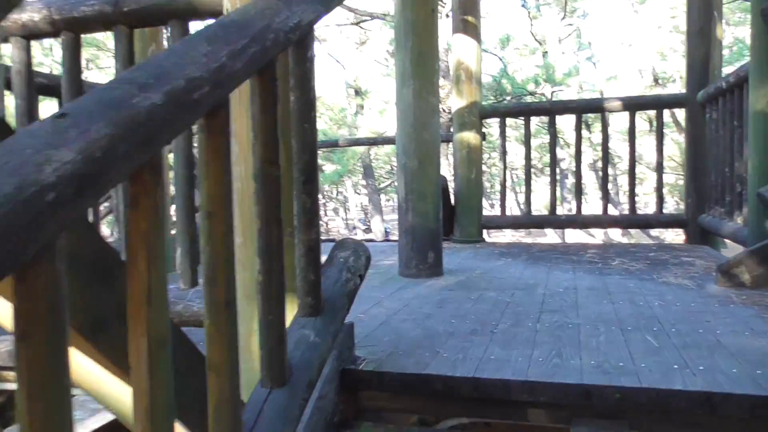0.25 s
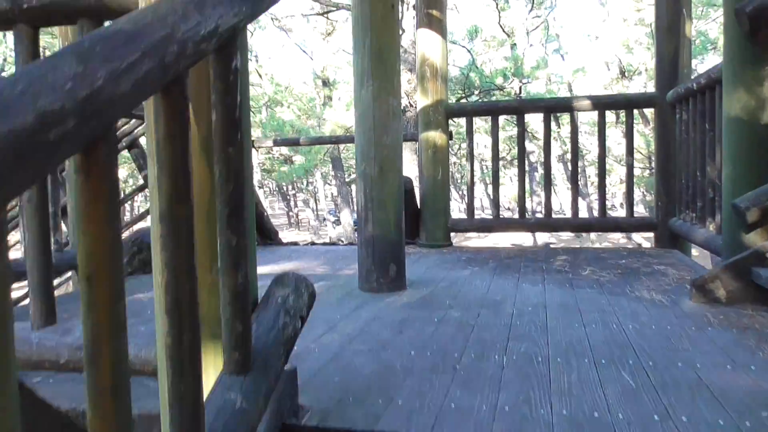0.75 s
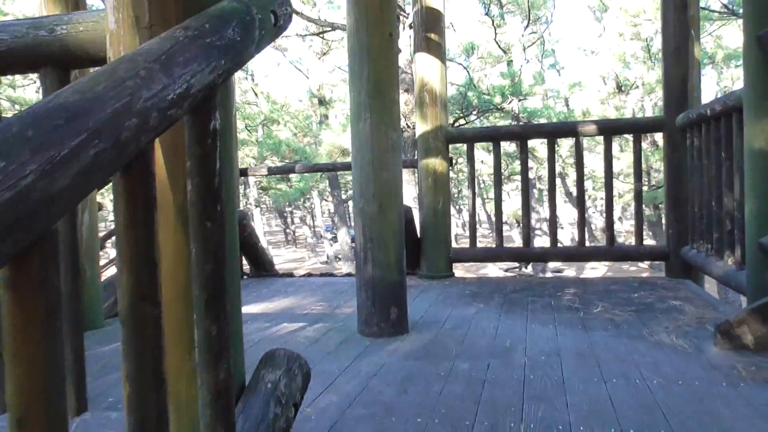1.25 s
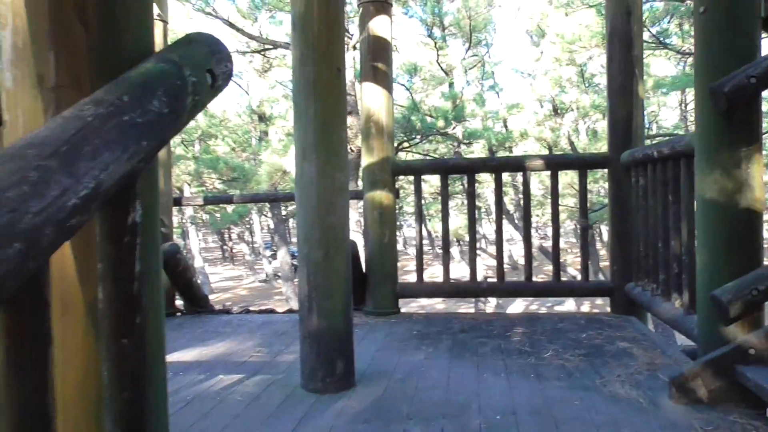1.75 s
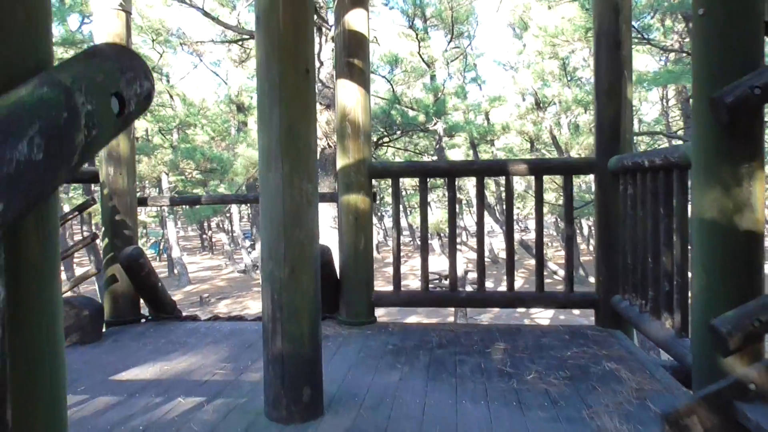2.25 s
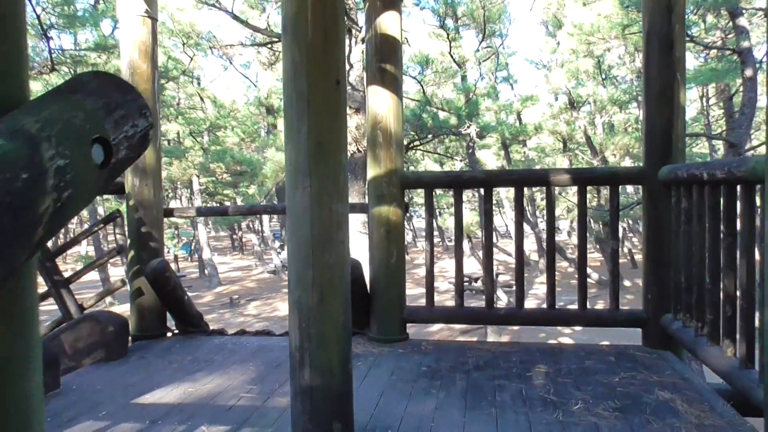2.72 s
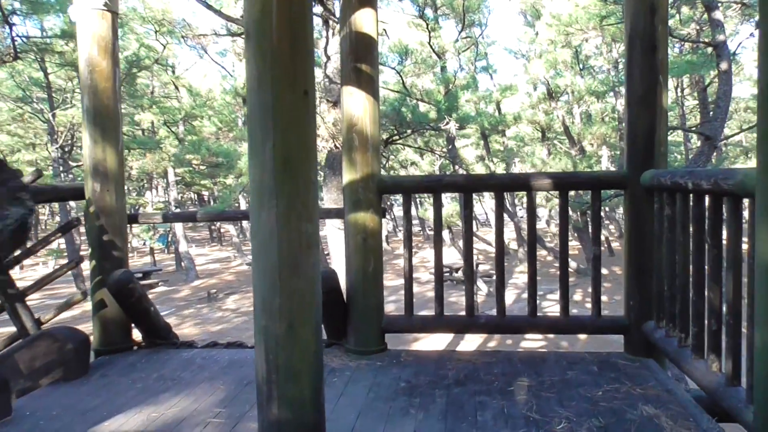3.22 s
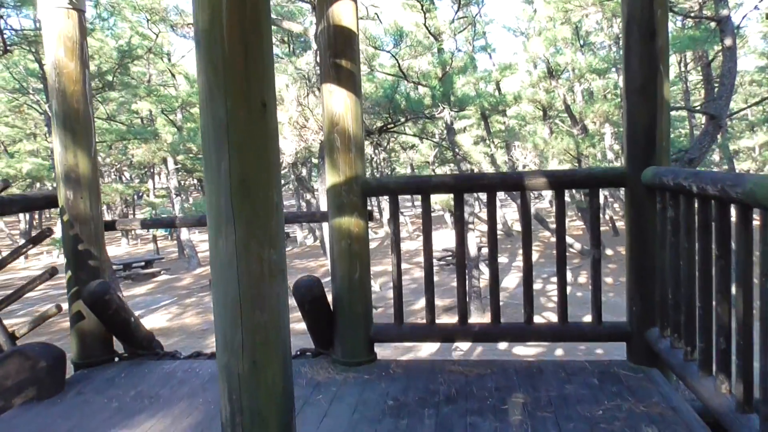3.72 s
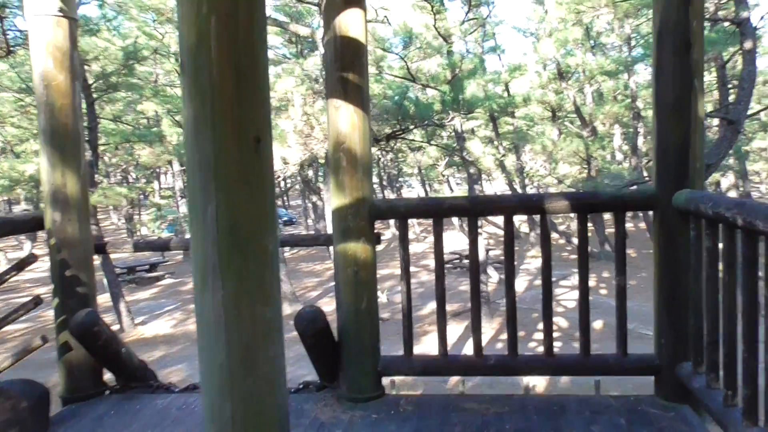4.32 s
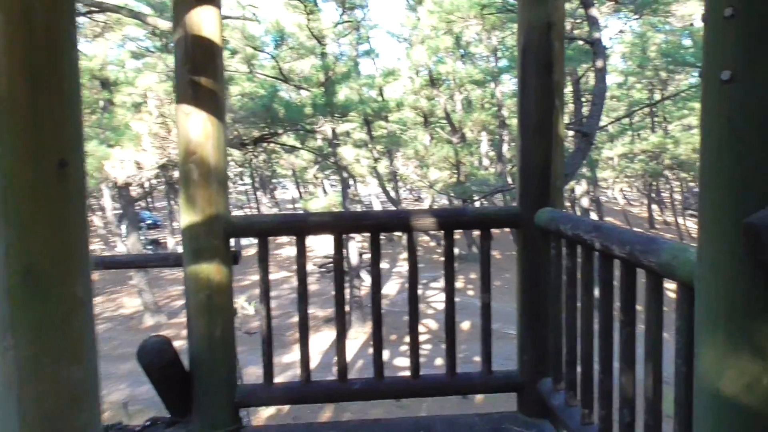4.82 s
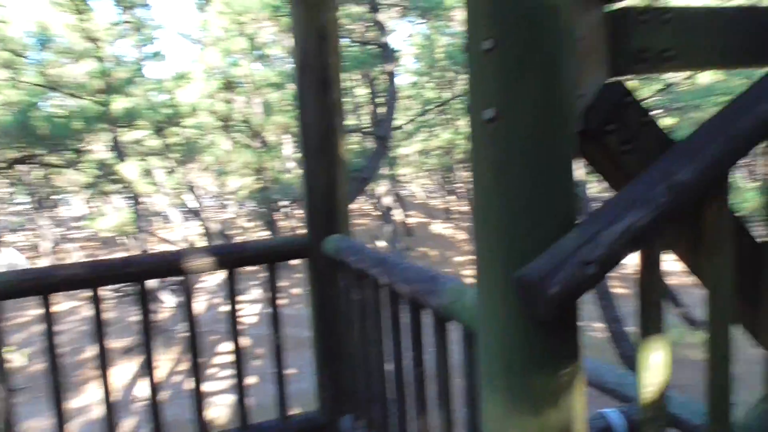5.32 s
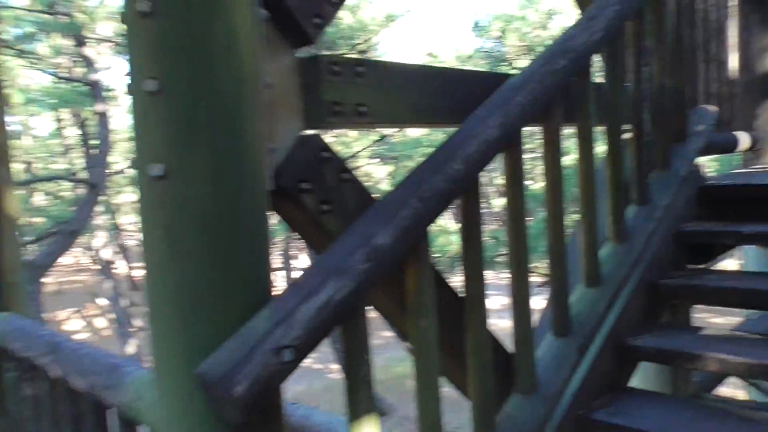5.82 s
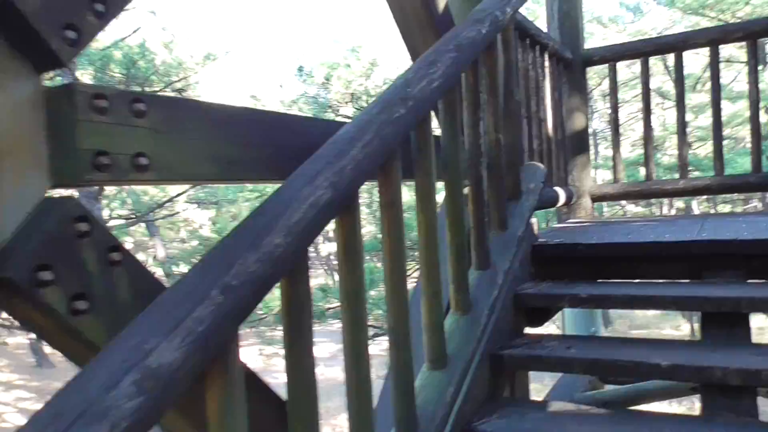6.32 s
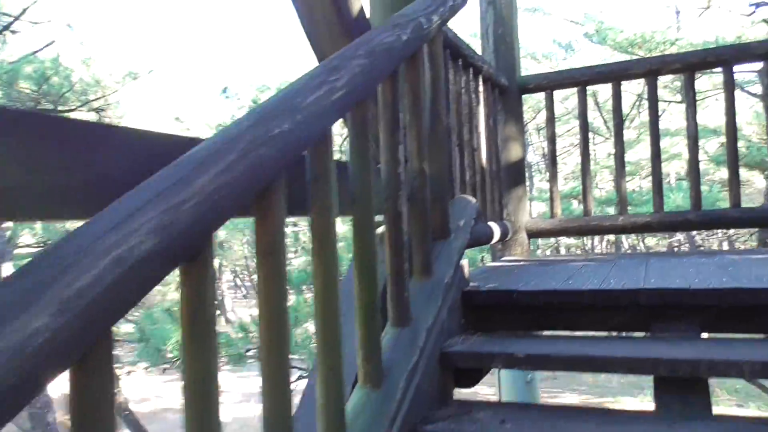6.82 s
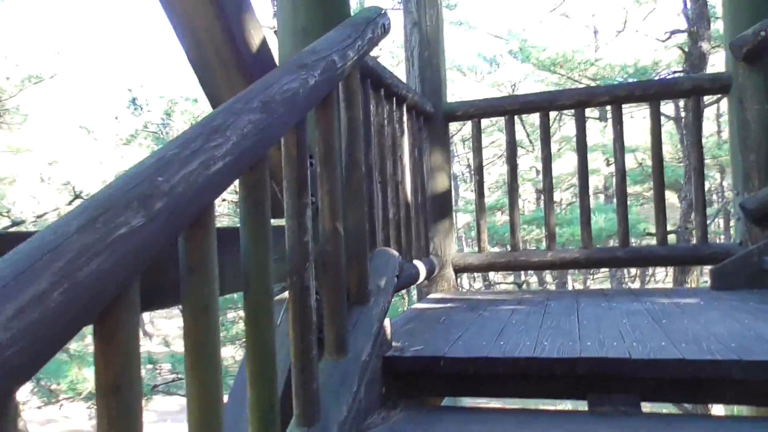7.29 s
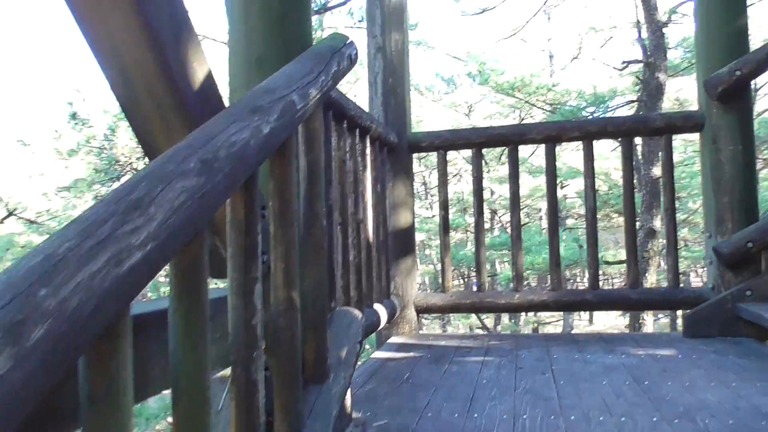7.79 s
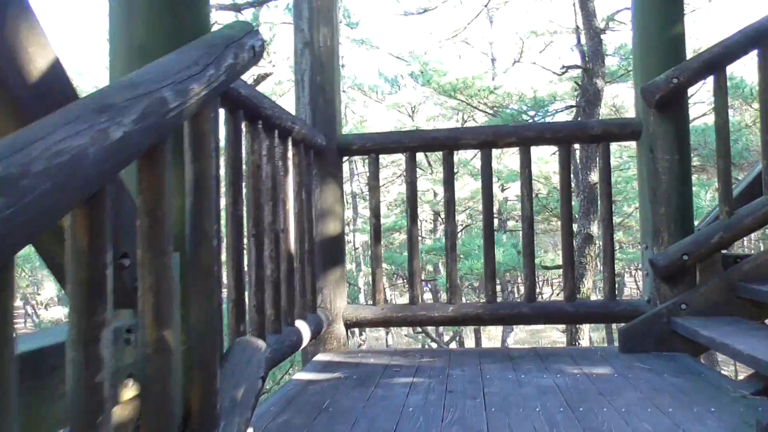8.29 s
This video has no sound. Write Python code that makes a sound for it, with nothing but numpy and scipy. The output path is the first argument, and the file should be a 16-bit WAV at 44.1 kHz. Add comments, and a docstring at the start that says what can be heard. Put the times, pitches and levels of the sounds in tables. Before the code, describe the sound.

Shoes knock on wooden treads at an even walking pace, with soft rustling clothes and a few tiny metallic ticks.

```python
"""Someone climbs the stairs of a wooden tower, camera in hand, over a low drone, a hum and still air.
First the heel knocks a tread and grinds grit; the foot rolls onto its ball as the knock spreads through
the deck, and the frame swings in its deepest mode. On some steps the toe then taps. Clothes swish as the
knee bends, as the other leg lifts and as it swings. Now and then, as the climb goes on, something peeps
far off in the pine wood, or a small metal piece ticks against the camera."""
import sys
import numpy as np
from scipy import signal
from scipy.fft import rfft, irfft, next_fast_len
from scipy.io import wavfile
from scipy.ndimage import uniform_filter1d, map_coordinates

SR = 44100
rng = np.random.default_rng(int(sys.argv[2]) if len(sys.argv) > 2 else 0)


def wav_out(sig):
    """Save sig, one row per channel (or a flat mono array), as 16-bit PCM at SR to the path in sys.argv[1]."""
    wavfile.write(sys.argv[1], SR, np.round(np.clip(np.atleast_2d(sig).T, -1, 1) * 32767).astype(np.int16))


N = 377055

# Footfalls. Each row: start in seconds, heel level in dB, tread pitch in Hz, upper edge of the shoe's
# excitation in Hz, clack and thump in dB, roll from heel to ball in seconds, then levels in dB of the
# ball, the grit, the frame's sway, and the cloth on landing, on lifting and on swinging.
STEPS = [(-.075, -11, 340, 1480, 0, -10, 0.012, -34, -50, -51, -59, -88, -66.5),
         (.631, -25.5, 284, 1720, -5, -2.5, 0.0094, -27.5, -52.5, -54, -66, -68, -63.5),
         (1.3376, -8, 466, 1340, -9, -15, 0.0053, -29, -46, -54, -65, -72, -68),
         (2.062, -27.5, 361, 1750, -12, -9.5, .014, -24.5, -44, -59, -67.5, -65.5, -63.5),
         (2.769, -12, 406, 2050, -9.5, -12.5, .004, -22, -42.5, -52, -64, -82, -64),
         (3.4746, -13.5, 417, 1820, 0.5, -8, 0.00359, -15.5, -43.5, -60, -59.5, -90, -70.5),
         (4.219, -9.5, 396, 1270, -13.5, -18, .005, -20, -43, -61, -62, -79, -62.5),
         (4.9963, -24, 336, 1410, -8.5, -7.5, .028, -28, -55, -48, -61.5, -68, -82),
         (5.9605, -28.5, 271, 1250, -19, -5, .012, -39, -56, -60, -58.5, -63, -65),
         (6.746, -29, 305, 1250, -14, -7, 0.058, -30.5, -60, -68, -63.5, -80, -64.5),
         (7.521, -33, 306, 1820, -3, -11, 0.0078, -24.5, -49.5, -62, -64, -75, -70.5),
         (8.261, -27, 370, 1610, -6, -9.5, 0.0047, -19.5, -49.5, -54, -69, -70, -72)]
# Settling toes. Each row: start in seconds, tap level in dB, grit level in dB, scrape t60 in seconds.
TOES = [(.02, -40, -55, 0.074), (1.421, -34, -47, 0.056), (1.495, -55, -56.5, 0.2),
        (2.868, -41, -54.5, 0.11), (4.309, -50, -51, 0.065), (6.062, -35.5, -56, 0.59),
        (6.878, -37.5, -51, 0.17)]


def footsteps():
    """Impact excitation: the heel strikes the tread, then the softer ball, and sometimes the toe."""
    out = np.zeros((2, N))
    light_step_db = -29
    for start, heel_db, pitch_hz, edge_hz, clack_db, thump_db, roll_s, ball_db, *_ in STEPS:
        dry_db = 0.2 * (heel_db - light_step_db)  # more of a hard blow stays in the tread
        heel = knock(pitch_hz, edge_hz, clack_db, thump_db, deck_db=-12 - dry_db)
        ball = knock(0.9 * pitch_hz, edge_hz, clack_db - 8.5, thump_db - 6, deck_db=-13.5 - dry_db)
        add(out, start, amp(heel_db) * heel)
        add(out, start + roll_s, amp(ball_db) * ball)
    for start, tap_db, *_ in TOES:
        toe = knock(pitch_hz=315, edge_hz=1700, clack_db=-3.5, thump_db=-16.5, deck_db=-7.5)
        add(out, start, amp(tap_db) * toe)
    return panned(low_cut(out, corner_hz=53), pan_db=2)


def knock(pitch_hz, edge_hz, clack_db, thump_db, deck_db):
    """Structural coupling: one contact of the shoe drives both the tread and the deck around it."""
    t = np.arange(SR // 2) / SR
    drive = lambda hz: contact(hz, edge_hz, clack_db, thump_db)
    return tread(t, pitch_hz, drive) + amp(deck_db) * deck(t, drive)


def contact(hz, edge_hz, clack_db, thump_db):
    """Force spectrum of an impact: a hard heel clacks, a flat foot thumps; it falls away above the edge."""
    tilt = amp(along([(170, thump_db), (290, 0), (600, 0), (1100, clack_db)], hz))
    return tilt / np.sqrt(1 + (hz / edge_hz) ** 10)


def tread(t, pitch_hz, drive, attack_s=0.00051):
    """Modal superposition: the board rings in a few heavily damped modes, neighbours in opposite senses."""
    # Each row: multiple of the tread's pitch, relative level in dB, t60 in seconds.
    modes = [(.36, -6, 0.096), (.55, -2, 0.05), (1.001, 13.5, 0.034), (1.45, 8, 0.021), (2, 3, 0.034),
             (2.75, 12, 0.009), (3.4, 7.5, 0.028), (4.1, 4.5, 0.022), (4.8, 5, 0.022)]
    ring = sum((-1) ** i * amp(db) * drive(ratio * pitch_hz) * damped_sine(t, ratio * pitch_hz, t60)
               for i, (ratio, db, t60) in enumerate(modes))
    ring *= 1 - np.exp(-t / attack_s)
    return ring / np.abs(ring).max()


def deck(t, drive, build_s=0.005):
    """Structural reverberation: countless board modes merge into noise, while a few beam modes ring out."""
    # The boards' response. Each row: frequency in Hz, relative spectral density in dB.
    board_spectrum = [(50, -14), (90, -2), (150, 1.5), (210, 5), (280, -8.5), (380, 0), (500, -4.5),
                      (640, -2), (800, -5), (1250, -5), (1700, -19.5), (2600, -24), (5000, -34)]
    # Their damping, weakest in the bass. Each row: frequency in Hz, t60 in seconds.
    board_decay = [(70, 0.78), (170, 0.37), (400, 0.22), (1200, 0.15), (4000, 0.39)]
    # Each row: frequency in Hz, relative level in dB, t60 in seconds.
    beam_modes = [(148.5, 4, 0.23), (197.3, 2.5, 0.24), (226.6, 6, 0.073), (324.5, -9, 0.22),
                  (398, -10, 0.19), (550, -6, 0.1), (1165, -29, 0.12), (1365, -20, 0.19)]
    wash = unit(filtered(noise(board_spectrum, len(t)), drive))
    band_hz, when, bands = signal.stft(wash, SR, nperseg=512)
    bands *= fade(when, along(board_decay, band_hz)[:, None])
    boards = signal.istft(bands, SR, nperseg=512)[1][:, :len(t)]
    beams = sum(amp(db + rng.normal()) * drive(hz) * damped_sine(t, hz, t60, rng.random())
                for hz, db, t60 in beam_modes)
    return (boards + amp(1) * beams) * rise(t, build_s)


def low_cut(x, corner_hz):
    """High-pass filter: the footsteps are thinned out below corner_hz."""
    return signal.sosfilt(signal.butter(2, corner_hz, "high", fs=SR, output="sos"), x)


def frame():
    """Free vibration: at each step the whole tower swings into its deepest mode and dies away."""
    out, t = np.zeros((2, N)), np.arange(SR) / SR
    sway = damped_sine(t, hz=32, t60=1.0) * rise(t, rise_s=0.054)
    for start, *_, sway_db, _landing, _lift, _swing in STEPS:
        add(out, start, amp(sway_db) * sway)
    return out


def scuffs():
    """Sliding friction: every heel and every settling toe grinds some grit."""
    out = np.zeros((2, N))
    for start, *_, grit_db, _sway, _landing, _lift, _swing in STEPS:
        add(out, start, amp(grit_db) * crunch(t60=0.091))
    for start, _, grit_db, t60 in TOES:
        add(out, start, amp(grit_db) * crunch(t60))
    return out


def crunch(t60):
    """Granular noise: grit under the sole gives a decaying burst of uneven strength."""
    # Each row: frequency in Hz, relative spectral density in dB.
    grit_spectrum = [(500, 6), (1400, 10.5), (2800, 3.5), (4500, 4), (9000, 0), (12000, 0), (15500, -23)]
    t = np.arange(SR // 3) / SR
    grain_db = 2.5 * unit(uniform_filter1d(rng.standard_normal(len(t)), 40))
    return unit(amp(grain_db) * noise(grit_spectrum, len(t))) * fade(t, t60)


def ticks():
    """Impulse response: a small metal piece strikes the camera, chatters and rings for milliseconds."""
    # Each row: start in seconds, peak level before panning in dB.
    strikes = [(0.7361, -22.5), (2.326, -33.5), (2.8938, -38.5), (5.1183, -22.5), (5.6758, -33),
               (7.301, -45)]
    # Each row: frequency in Hz, relative level in dB, t60 in seconds.
    metal_modes = [(3400, -29, 0.0035), (4650, -11.5, 0.005), (6050, -38, 0.003), (7310, 3.5, 0.0059),
                   (8820, -12, 0.0073), (9200, -25, 0.01), (10500, -23, 0.011)]
    # Each row: frequency in Hz, relative spectral density in dB.
    chatter_spectrum = [(2200, -8), (3700, -3), (9000, -5), (11500, 0), (14500, -12)]
    out, t = np.zeros((2, N)), np.arange(SR // 20) / SR
    for start, peak_db in strikes:
        ring = sum(amp(db + rng.normal()) * damped_sine(t, hz, t60, rng.random())
                   for hz, db, t60 in metal_modes)
        chatter = amp(-2) * noise(chatter_spectrum, len(t)) * fade(t, t60=0.0028)
        tick = (ring + chatter) * rise(t, rise_s=0.00047)
        add(out, start, amp(peak_db) * tick / np.abs(tick).max())
    return panned(out, pan_db=-4.5)


def clothes():
    """Friction noise: cloth slides over cloth three times a stride, fluttering with its folds."""
    # Each row: frequency in Hz, relative spectral density in dB.
    cloth_spectrum = [(500, -32), (1200, 8.5), (1800, -5), (3000, -6.5), (4400, 2), (5900, -7.5), (7600, 3),
                      (11500, 0), (13500, -15), (16000, -26)]
    sliding = np.zeros((1, N))
    for start, *_, landing_db, lift_db, swing_db in STEPS:
        # Each row: lag from footfall to mid-swish in seconds, length in seconds, level in dB.
        swishes = [(0.09, 0.31, landing_db), (0.336, 0.25, lift_db), (0.559, 0.4, swing_db)]
        for lag, length, db in swishes:
            swell = signal.windows.tukey(int(length * SR), alpha=0.77)
            add(sliding, start + lag - length / 2, amp(db) * swell)
    folds = amp(1.9 * wobble(rate=30))
    return sliding * folds * noise(cloth_spectrum, N)


def peeps(half_width_hz=45):
    """Narrow-band noise is heard as pitch: faint, far tones, blurred by the trees."""
    # Each row: middle in seconds, pitch in Hz, level in dB, length at half amplitude in seconds.
    far_peeps = [(.44, 1160, -66.5, 0.065), (3.86, 1115, -65.5, 0.053), (4.722, 1440, -61.5, 0.035),
                 (6.4, 1127, -62, 0.056), (8.07, 1015, -64, 0.05)]
    out = np.zeros((2, N))
    for middle, pitch_hz, db, length in far_peeps:
        size = int(2 * length * SR)
        band = lambda hz: np.exp(-((hz - pitch_hz) / half_width_hz) ** 2)
        tone = unit(filtered(rng.standard_normal(size), band))
        add(out, middle - length, amp(db) * tone * np.hanning(size))
    return out


def drone(gain_db=3, waver_db=1.17):
    """Amplitude modulation: a low band of noise slowly swells and sinks, wavering a little."""
    # Each row: frequency in Hz, relative spectral density in dB.
    drone_spectrum = [(60, -27), (130, -11.5), (210, -6), (255, 0), (305, 0.5), (400, -6), (600, -11.5),
                      (1000, -16.5), (2000, -35.5)]
    # Each row: time in seconds, relative level in dB.
    swells = [(0.0, -58.5), (4.17, -59.5), (4.36, -55.5), (4.88, -55.5), (5.57, -63), (7.26, -55.5),
              (8.14, -61.5), (8.55, -56)]
    swell_db = np.interp(np.arange(N) / SR, *np.transpose(swells))
    level_db = swell_db + gain_db + waver_db * wobble(rate=28)
    return panned(amp(level_db) * noise(drone_spectrum, N), pan_db=4)


def background(air_db=-63, hum_db=-66.5):
    """Ambient noise floor: still air in the wood and a faint low hum of wandering pitch."""
    # Each row: frequency in Hz, relative spectral density in dB.
    air_spectrum = [(25, -32), (60, -6.5), (120, -6.5), (170, -32), (400, -2), (700, -8), (1150, -12.5),
                    (1900, -23), (2300, -19), (3200, -28.5), (6000, -25), (8200, -19.5), (12000, -24.5),
                    (15800, -43)]
    hum_hz = 119.5 + 2 * wobble(rate=10)
    hum = np.sin(2 * np.pi * np.cumsum(hum_hz) / SR)
    return amp(air_db) * noise(air_spectrum, N) + amp(hum_db) * hum


def noise(spectrum, size):
    """Partial coherence: coloured stereo noise of rms 1, near mono in the bass, wide in the top treble."""
    # Each row: frequency in Hz, correlation between left and right.
    coherence = [(100, 0.85), (400, 0.86), (1200, 0.47), (3000, 0.78), (7000, 0.49), (12000, 0.051)]

    def mid_side_gains(hz):
        angle = np.arccos(np.clip(along(coherence, hz), -1, 1)) / 2
        return amp(along(spectrum, hz)) * [np.cos(angle), np.sin(angle)]

    mid, side = filtered(rng.standard_normal((2, size)), mid_side_gains)
    return unit(np.array([mid + side, mid - side]))


def damped_sine(t, hz, t60, phase=0):
    """Damped harmonic motion of one mode, its phase given in cycles."""
    return fade(t, t60) * np.sin(2 * np.pi * (hz * t + phase))


def fade(t, t60):
    """Exponential decay by 60 dB in t60 seconds."""
    return np.exp(-np.log(1000) * t / np.maximum(t60, 1e-4))


def rise(t, rise_s):
    """Smooth onset from 0 towards 1."""
    return 1 - np.exp(-(t / rise_s) ** 2)


def wobble(rate):
    """A smooth random curve with rate knots a second."""
    knots = rng.standard_normal(int(N * rate / SR) + 4)
    return map_coordinates(knots, [np.arange(N) * rate / SR])


def filtered(x, response):
    """Linear filtering: the spectrum of x times a frequency response."""
    size = x.shape[-1]
    padded = next_fast_len(size + 4096)
    hz = np.fft.rfftfreq(padded, 1 / SR)
    return irfft(rfft(x, padded) * response(hz), padded)[..., :size]


def along(points, hz):
    """Interpolation of (Hz, value) points on a logarithmic frequency axis."""
    point_hz, values = np.transpose(points)
    return np.interp(np.log(hz + 1), np.log(point_hz + 1), values)


def amp(db):
    """Decibels to amplitude ratio."""
    return 10 ** (np.asarray(db) / 20)


def unit(x):
    """Normalisation to rms 1."""
    return x / np.sqrt(np.mean(x ** 2) + 1e-20)


def panned(x, pan_db):
    """Direction by level: left is louder than right by pan_db."""
    return x * amp([[pan_db / 2], [-pan_db / 2]])


def add(track, start_s, sound):
    """Mix a sound into the track at start_s, dropping what falls outside."""
    start = round(start_s * SR)
    part = sound[..., max(-start, 0):max(N - start, 0)]
    first = max(start, 0)
    track[:, first:first + part.shape[-1]] += part


def scene():
    """Superposition: the pressures of all sources on and around the stairs add."""
    return footsteps() + frame() + scuffs() + ticks() + peeps() + clothes() + drone() + background()


def record(dry, top_hz=15800):
    """Band limiting: the camera keeps nothing above top_hz."""
    return filtered(dry, lambda hz: hz < top_hz)


dry = scene()
out = record(dry)
wav_out(out)
```